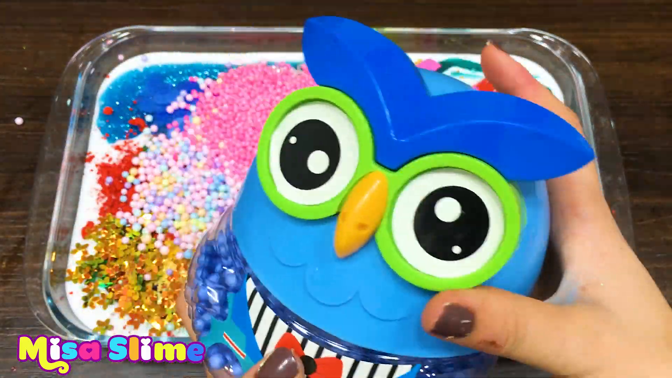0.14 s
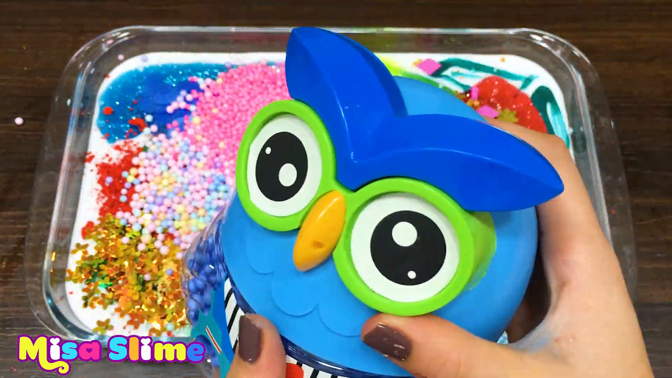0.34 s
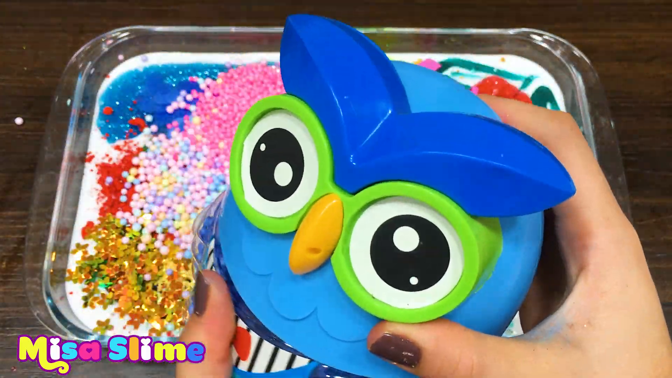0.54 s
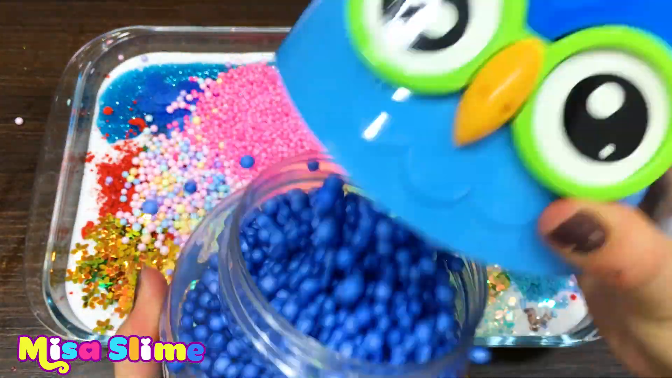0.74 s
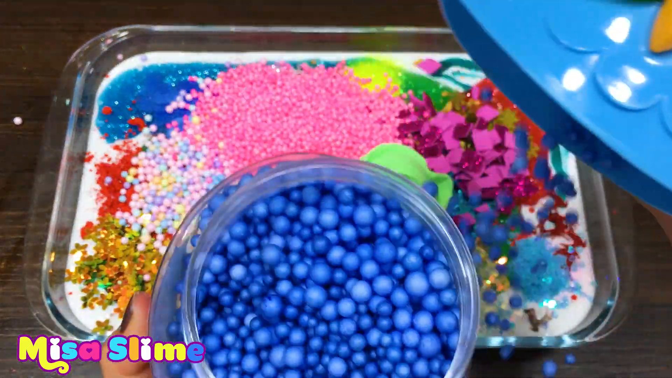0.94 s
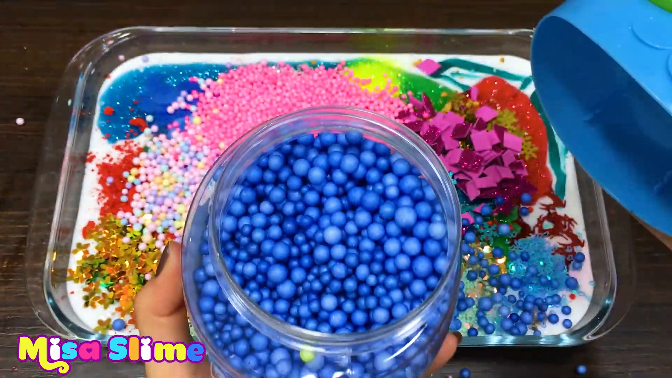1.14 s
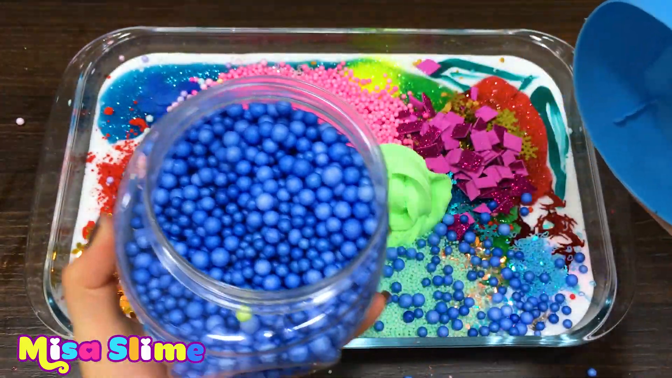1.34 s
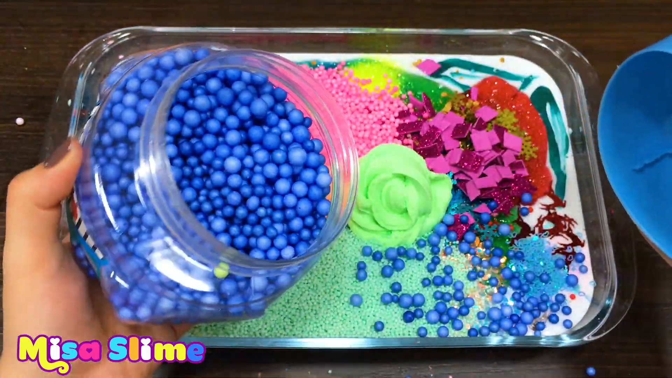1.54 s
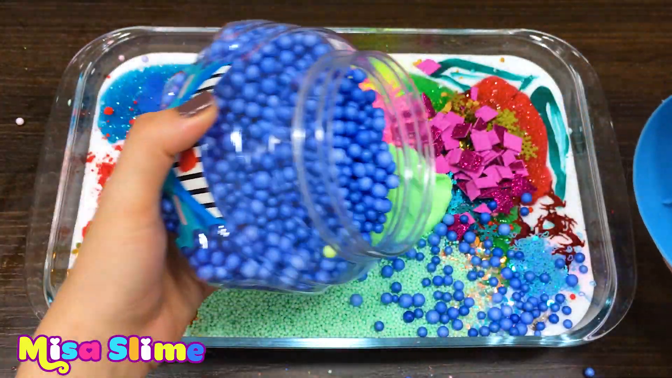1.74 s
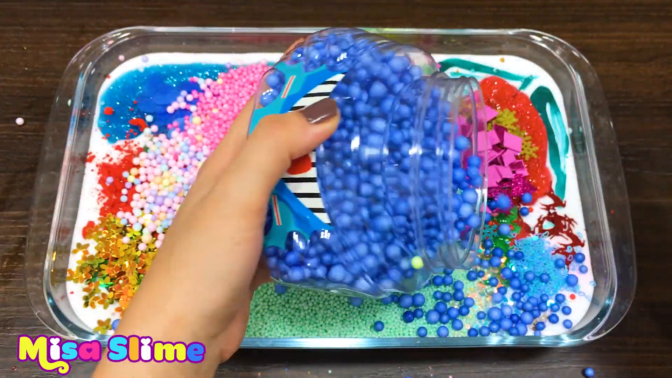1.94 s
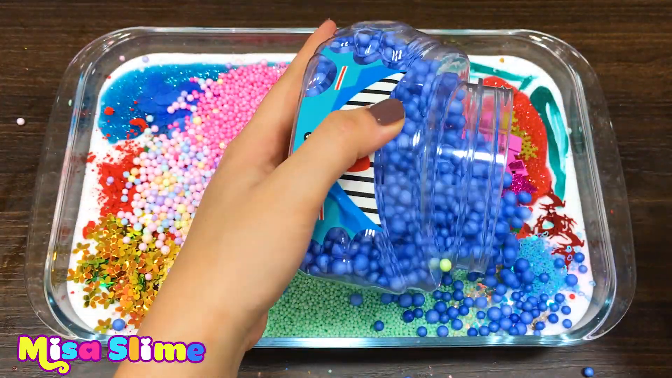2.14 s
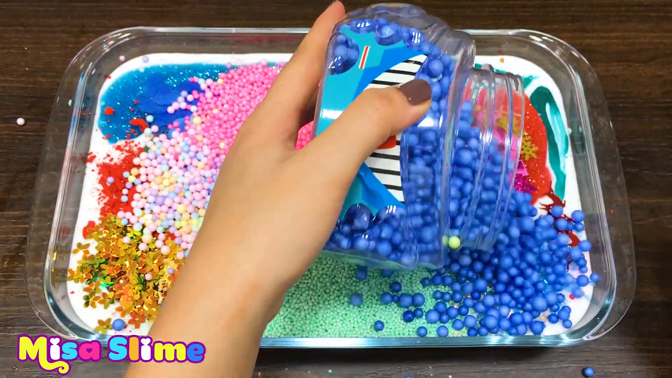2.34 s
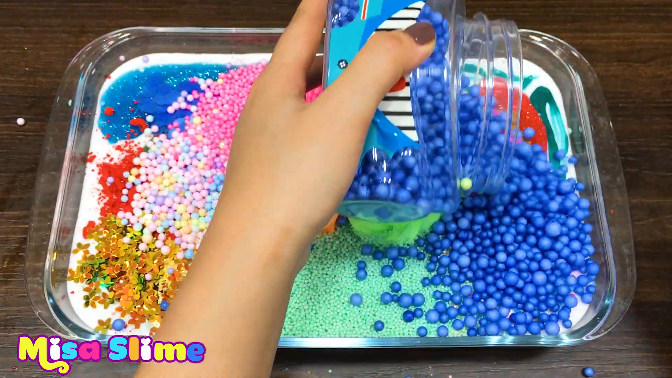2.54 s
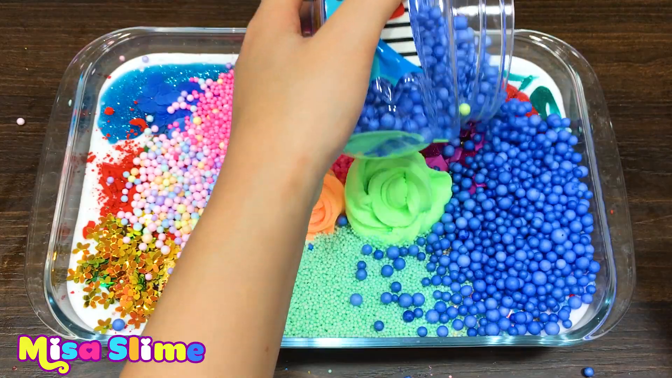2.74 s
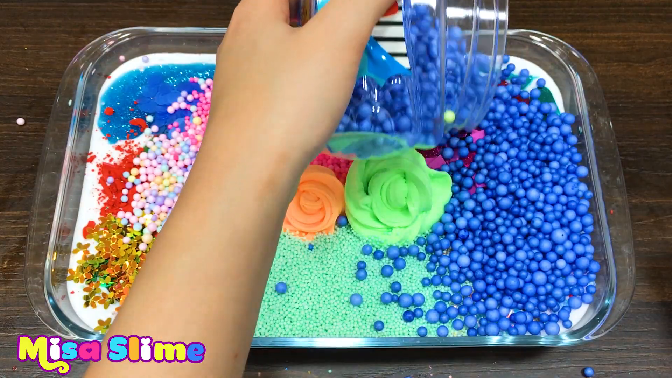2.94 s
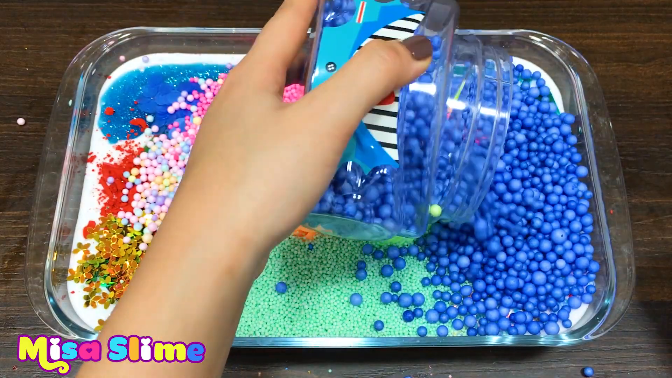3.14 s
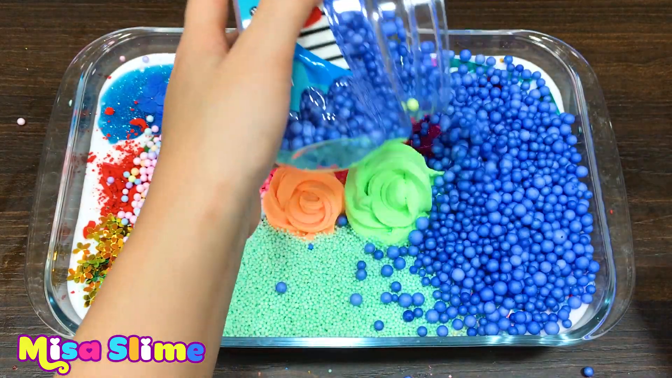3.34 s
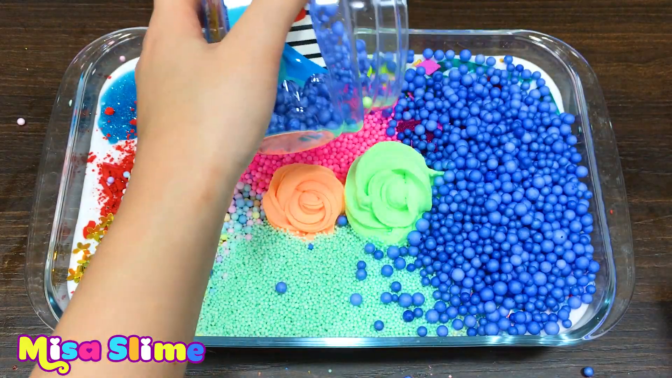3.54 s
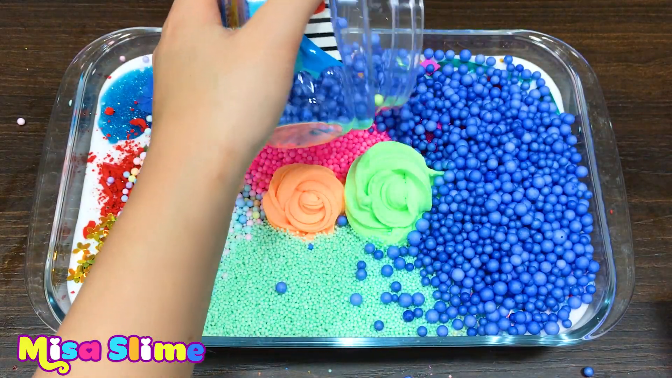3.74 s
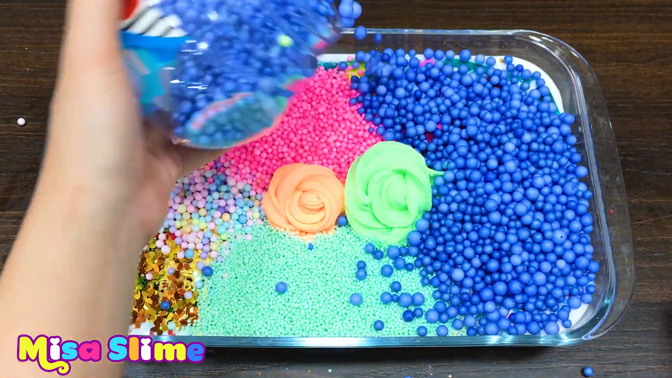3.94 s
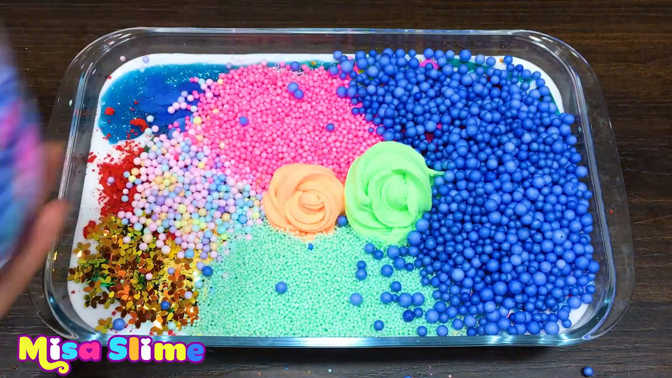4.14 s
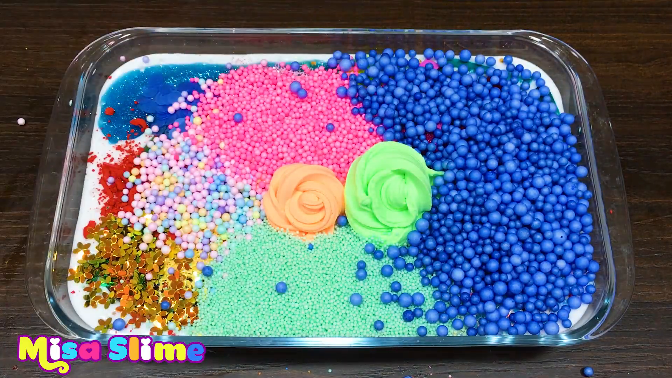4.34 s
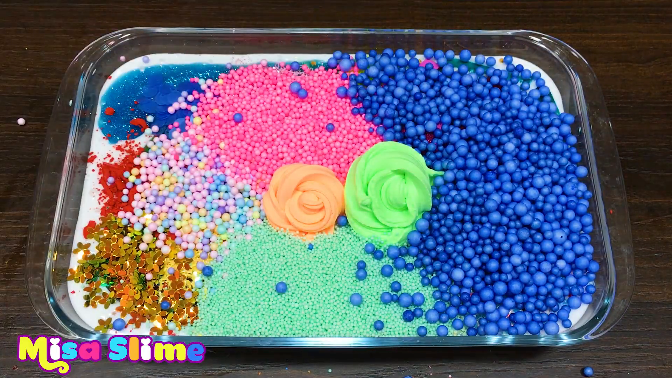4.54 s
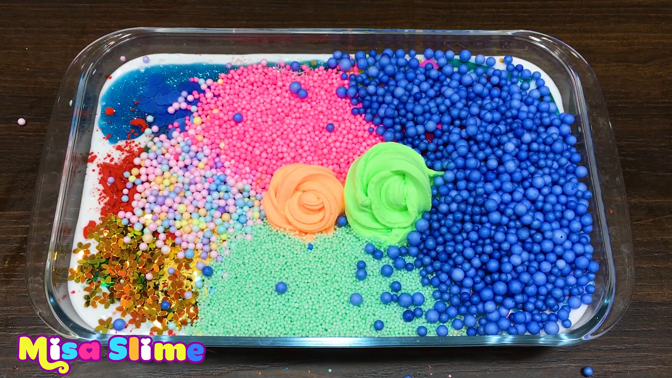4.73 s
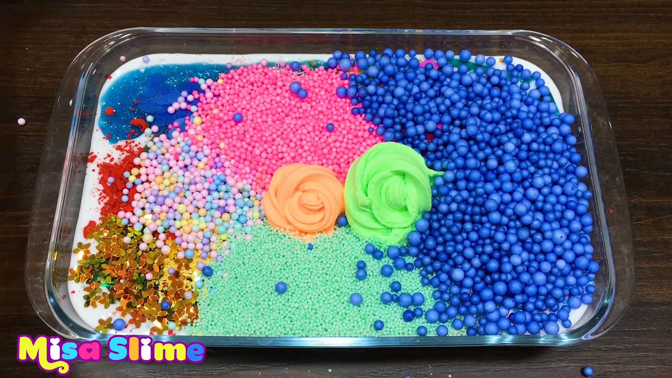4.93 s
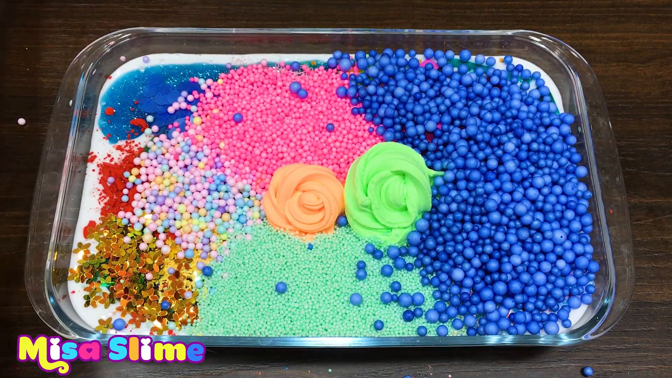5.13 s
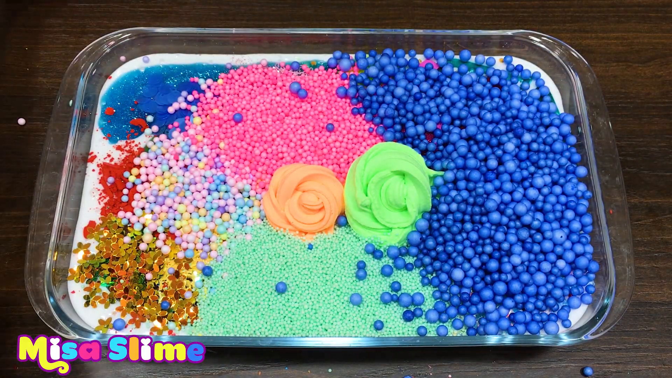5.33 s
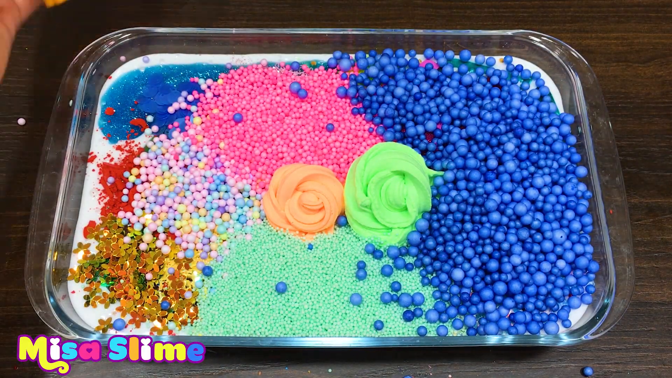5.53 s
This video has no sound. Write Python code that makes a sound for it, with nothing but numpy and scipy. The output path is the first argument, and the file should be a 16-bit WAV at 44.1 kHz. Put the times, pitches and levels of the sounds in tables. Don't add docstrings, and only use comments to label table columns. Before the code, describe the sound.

Close, dry handling sounds in a bare room with a short reverberant tail, over soft hiss and uneven low rumble from moving hands. From 0.15 to 0.6 s a hollow plastic lid is twisted, with small knocks, thread scrapes and faint bead rustle. At 0.61 s it snaps free with a very loud, sharp crack that overloads; at about 0.84 s it knocks the rim in a quick, hard clatter. Beads spill with a light patter until 1.3 s, single ones skipping away, then near quiet. From 2 s the tipped jar releases a growing stream of tiny crisp clicks with a thin plastic ring, fullest around 2.5 to 3.5 s. Sparse trickling follows until 4.15 s. At 4.2 to 4.7 s the remaining beads rattle back, more resonant, with sharp ticks. The jar is set down softly at 4.7 s; after a lull, a jerky plastic scrape at 5.3 to 5.5 s fades out.

```python
import sys
import numpy as np
from scipy import signal
from scipy.fft import irfft
from scipy.io import wavfile
from scipy.ndimage import uniform_filter1d

SR = 44100
rng = np.random.default_rng(int(sys.argv[2]) if len(sys.argv) > 2 else 0)


def digitize_waveform(pressure):
    field = np.atleast_2d(pressure).T
    bounded = np.clip(field, -1, 1)
    quanta = np.round(bounded * 32767).astype(np.int16)
    wavfile.write(sys.argv[1], SR, quanta)


def voltage_ratio(level):
    return 10 ** (np.asarray(level, float) / 20)


N = 250488
TIME = np.arange(N) / SR

# (time [s], peak [dB], cavity boom [dB], crack [dB], contact [ms])
LID_TWISTS = [(.149, -49, -5.5, -10, 2), (.1572, -36.5, -3.5, -2, 3.3), (.2665, -41.5, -4.5, -12, 2),
              (.277, -45.5, -8, -4, 2), (.2822, -39.5, -9.5, -5, 2.8), (.3731, -40.5, -11.5, -6.5, 2.5),
              (.4155, -51, -2.5, -1, 4.2), (.433, -49, 0.5, -6, 5.1), (.392, -50.5, 8.5, -11, 2.8),
              (.4565, -33.5, 1, -4.5, 2.7), (.5034, -36, -8.5, 12, 1.2), (.5332, -36, -10.5, 10.5, 1.4),
              (.5532, -40.5, -6.5, 8.5, 1.73), (.5885, -41, -18, 3.5, 2), (.595, -41, -16, 5.5, 2.7)]
LID_SNAPS = [
    (0.6074, -11, -14.5, -5.5, 2),
    (0.6131, 5.5, -12.5, -3.5, 4.6),
]
LID_NUDGES = [
    (0.7714, -21.5, -15.5, -15.5, 2.3),
    (0.7763, -27.5, 13, -17.5, 3.6),
    (0.7835, -25, 8, -3, 4),
    (0.8164, -20, 0.5, -6, 4.4),
    (.819, -20, 7, -6, 5),
]
LID_BUMPS = [
    (.8399, -4.5, -13, 3.5, 3.4),
    (.8425, -5.5, -3.5, -7, 3.7),
    (.8465, -9.5, -2.5, -8.5, 4.2),
    (.853, -23.5, 11.5, -8.5, 2.6),
    (1.059, -34.5, 0, -14, 3.1),
]
# (pitch [Hz], level [dB], 60 dB decay [s])
TIGHT_MODES = [(317, -4, .025), (490, 0, 0.014), (860, -12, 0.016), (1320, 0, 0.045), (1520, 0, 0.018),
               (1820, -5, .015), (2420, -4.5, 0.032), (2950, -5.5, 0.018), (3820, -9.5, 0.013)]
SNAP_MODES = [(354, 3, 0.02), (518, -11.5, 0.018), (778, -14, 0.021), (1163, 2.5, .024), (1340, -4, 0.015),
              (1620, -4, 0.013), (1805, -1, 0.025), (2010, -10, 0.0062), (2340, -6.5, 0.025),
              (2534, -7.5, .018), (2985, -9, 0.019), (3240, -10, 0.024), (3800, -6.5, 0.0049),
              (4000, -12, 0.01)]
LOOSE_MODES = [(351.8, 0, 0.016), (430.8, -5, .014), (630, -13.5, .012), (1210, 3.5, 0.018),
               (1780, -10, 0.023), (2800, -13, 0.016)]
LIFTED_MODES = [(418, -0.5, 0.012), (484, -8, 0.02), (666, -2, 0.03), (972, -5, 0.015), (1080, 1.5, 0.017),
                (1310, 4, 0.034), (1540, -4, 0.013), (1701, -0.5, 0.061), (2235, -2.5, 0.03),
                (2786, -1, 0.023), (3100, -10.5, 0.024), (3658, -20, 0.0062), (4270, -9, 0.011)]
# (frequency [Hz], level [dB per Hz])
CRACK_COLOUR = [(300, -24.5), (1000, -2), (3000, -5), (3800, -8), (5000, -4), (6100, -9.5), (7150, -5),
                (8000, -10), (9300, -12), (10700, -9.5), (12200, -15.5), (13800, -21.5), (15200, -19.5),
                (17000, -28.5)]
# (frequency [Hz], level [dB])
LID_ECHO = [(200, 1.5), (400, 0.5), (800, -3.5), (1200, -2), (1800, -1.5), (2800, 1), (3800, -1), (5500, 0),
            (8500, -2.5), (14000, -2.5)]

# (time [s], level [dB])
RUSTLE = [(0, -73.5), (.26, -76), (.324, -67.5), (.46, -70), (.586, -68), (.6, -56.5)]
SPILL = [(.62, -50), (.92, -45), (1.15, -51.5), (1.25, -54.5), (1.33, -63.5), (1.55, -83)]
POUR = [(1.8, -79), (1.99, -66), (2.25, -59.5), (2.36, -53.5), (2.501, -50), (2.751, -51), (3.0, -53.5),
        (3.37, -52), (3.65, -57.5), ]
TRICKLE = [(3.64, -54.5), (3.75, -68.5), (3.87, -58.5), (4.03, -58.5), (4.13, -65), (4.179, -78)]
SLIDE_BACK = [(4.17, -68.5), (4.3, -56), (4.33, -55), (4.4, -53.5), (4.574, -57), (4.69, -67.5),
              (4.72, -68.5)]
# (wall ring at first [dB], at last [dB], neck ring [dB], bead rate [log10 of beads per s])
FLOW_SETTINGS = [
    (2.5, 2.5, -12.5, 3.4),
    (-14, -15, -21, 3.5),
    (-4.5, -14.5, -19, 3.72),
    (-18.5, -6.5, -13, 4.1),
    (-9, -0.5, -14, 3.6),
]
# (frequency [Hz], level [dB per Hz])
BEAD_COLOUR = [(710, -35.5), (1200, -6), (1680, -10), (2070, -5.5), (2810, -3.5), (3810, -8.5), (4110, -3),
               (5830, -5), (6370, -7.5), (7100, -3), (9630, -6), (12000, -1.5), (13700, -3.5), (15100, -2),
               (16300, -6.5)]
# (pitch [Hz], width [Hz], level [dB])
CLOSED_WALL = [(340, 150, -3), (510, 130, 1.5), (1230, 200, 0), (1600, 200, 0), (2600, 480, -4)]
POURING_WALL = [(890, 78, -1.5), (1000, 260, -4.5), (1330, 150, 2.5), (1480, 370, -1), (1840, 250, 0),
                (2350, 200, -2.5), (2800, 220, -4.5)]
DRAINED_WALL = [(840, 65, 0.5), (2022, 300, -10), (2950, 210, -3.5)]
RIGHTED_WALL = [(386, 260, -0.5), (853, 110, 1.5), (1270, 86, 8), (1770, 260, -3.5), (2375, 110, -1.5),
                (2690, 79, -1), (3095, 197, -5.5)]
# (pitch [Hz], width [Hz])
NECK_AIR = (4120, 220)
# (time [s], level [dB], dies in [s])
NECK_RUSHES = [
    (1.99, -75.5, .03),
    (2.11, -64.5, 0.079),
    (2.285, -56, 0.025),
    (2.445, -50, 0.093),
    (2.57, -60.5, 0.038),
    (4.32, -58, 0.044),
]
# (time [s], level [dB], dies in [s])
WALL_SQUEEZES = [
    (.154, -53, 0.011),
    (.27, -47, 0.012),
    (1.95, -66.5, 0.13),
    (2.12, -60.5, 0.091),
    (4.26, -64, 0.1),
    (4.31, -57.5, 0.19),
]
# (time [s], peak [dB])
BEAD_SKIPS = [(.9994, -38), (1.0154, -31), (1.044, -33.5), (1.089, -46), (1.1857, -33), (1.2107, -37),
              (1.2223, -37.5), (1.2396, -29.5), (1.265, -40), (1.2832, -37), (1.3094, -34.5), (1.3246, -40),
              (1.3645, -49.5), (1.3942, -42.5), (1.434, -49), (1.4694, -51.5)]
# (time [s], peak [dB], centre [Hz])
STRAY_BEADS = [(1.5557, -53.5, 14200), (1.7701, -46, 12100), (1.9321, -51, 4340), (1.9703, -49, 4520),
               (2.07, -47.5, 11270), (2.089, -48, 4440), (2.1791, -41.5, 4000), (2.2448, -50, 4750),
               (2.2648, -45, 4360), (2.2918, -38, 5740), (2.306, -38, 4160), (2.3309, -47, 4040),
               (2.3529, -45, 5120), (2.3803, -38, 7630), (2.4707, -34, 4080), (2.5814, -40.5, 4180),
               (2.7665, -35, 5900), (2.9017, -35, 7100), (3.1003, -41, 6900), (3.108, -38, 7490),
               (3.176, -38, 5710), (3.203, -39, 5770), (3.336, -36, 6210), (3.388, -36, 4810),
               (3.4978, -42, 4960), (3.5326, -34, 4000), (3.5522, -40.5, 4860), (3.5906, -37, 11620),
               (3.639, -40, 4470), (3.7837, -46.5, 4430), (3.7961, -45, 7070), (3.827, -52.5, 4250),
               (3.848, -49, 4970), (3.8645, -41, 8380), (3.9069, -44, 4590), (3.945, -41, 4440),
               (4.0094, -42, 6850), (4.0291, -44, 3980), (4.081, -48, 5090), (4.1106, -39.5, 12100),
               (4.1696, -45.5, 7440), (4.1967, -61, 9570), (4.1967, -36.5, 11200), (4.2465, -34, 10630),
               (4.312, -37, 7820), (4.3294, -42, 4000), (4.3721, -35, 11700)]
# (time [s], peak [dB], centre [Hz], width
SHAPED_CLICKS = [(.305, -52, 6500, .5), (.391, -45, 5600, .3), (4.1392, -45, 6850, 0.68),
                 (4.1864, -42, 7400, 0.88), (4.2578, -43, 4440, .3), (4.481, -35.5, 6000, 1),
                 (4.55, -41, 6500, 0.9), (1.416, -50.5, 1620, 0.0843), (3.534, -38, 2860, 1.1),
                 (4.4196, -29.5, 8020, 1.8), (4.432, -40, 5440, 0.28), (4.606, -36, 1116, 0.75),
                 (4.606, -44, 9500, 1), (4.7135, -49.5, 2000, 0.83), (4.986, -48.5, 1090, 0.487)]

# (time [s], level [dB], brightness [dB])
SET_DOWN = [(4.71, -52.5, -6), (4.718, -48, -28.5), (4.816, -57.5, -21), (4.91, -79, -1), (5.0, -82.5, -2)]
DRAG = [(5.29, -56, -7), (5.298, -55, 0.5), (5.318, -51, 0), (5.34, -47, -1.5), (5.378, -47, -8.5),
        (5.395, -49.5, 0.5), (5.45, -54.5, 3.5), (5.482, -52.5, -7), (5.68, -88, -1)]
SCRAPE = [(.262, -66.5, -3.5), (.285, -59.5, -3), (.31, -67.5, -3), (.37, -66, -1.5), (.412, -67, 0.5),
          (.418, -55.5, 2), (.45, -57, 2.5), (.462, -55, 2.5), (.472, -69, -3)]
# (frequency [Hz], level [dB per Hz])
SET_DOWN_COLOUR = [(120, -57), (400, -5.5), (752, -14), (1000, -5.5), (1190, 3), (1450, -5.5),
                   (1800, -10.5), (2150, -9), (2330, -3.5), (2550, -11), (3100, -8.5), (4000, -15.5),
                   (5290, -25), (15100, -26), (16300, -48.5)]
DRAG_COLOUR = [(120, -28), (200, -18), (502, -6), (582, -12.5), (752, -0.5), (1000, -13.5), (1380, -6.5),
               (1650, -6.5), (2050, -4.5), (2680, -13), (4100, -6), (5600, -15.5), (7510, -8.5),
               (9710, -20), (11900, -17.5), (16300, -32)]
THREAD_COLOUR = [(300, -30), (1500, -4.5), (3500, -8), (5000, -5.5), (6200, 2), (8500, -8.5), (11500, -3.5),
                 (14000, -12.5), (16300, -14)]
# (time [s], level [dB], dies in [s])
BASE_JERKS = [
    (4.712, -65, 0.0026),
    (5.295, -47.5, .006),
    (5.327, -48.5, .008),
    (5.392, -44.5, .008),
    (5.409, -46, 0.00658),
    (5.422, -47.5, 0.0045),
    (5.433, -45.5, 0.0049),
    (5.444, -47.5, 0.003),
    (5.466, -50, 0.00507),
]
# (time [s], peak [dB], pitch [Hz], 60 dB decay [s])
TABLE_THUDS = [
    (0.279, -40, 95.3, 0.28),
    (0.4571, -38, 89.2, 0.067),
    (.613, -44.5, 89.75, .06),
    (0.847, -43.5, 69.7, 0.1),
    (1.061, -44, 211, 0.066),
    (2.08, -37, 70, 0.21),
    (5.3, -49, 190.4, .1),
]
# (time [s], level [dB], dies in [s])
HAND_HEAVES = [(0, -55.5, 0.54), (.17, -59, 0.14), (.3, -52, 0.054), (.45, -35, 0.0096), (.61, -57, 0.042),
               (.84, -45, 0.069), (1.07, -59, .1), (1.58, -54, 0.074), (1.76, -56.5, 0.064),
               (2.0, -50.5, 0.046), (2.08, -51, 0.21), (2.9, -68, 0.14), (3.7, -69, 0.11),
               (4.65, -64.5, 0.19), (5.14, -62.5, .1), (5.36, -55, 0.12), (5.6, -61, 0.18)]
# (frequency [Hz], level [dB per Hz])
RUMBLE_COLOUR = [(12, -66), (20, -33), (41, -6.5), (70, 0.5), (137, -3.5), (215, -18.5), (267, -15.5),
                 (321, -25.5), (600, -28.5), (780, -59), (1320, -120)]
# (frequency [Hz], level [dB per Hz])
HISS_COLOUR = [(120, -26), (200, -2.5), (264, -5), (335, -5.5), (540, -11.5), (661, -11), (781, -8.5),
               (872, -8.5), (1260, -9.5), (1960, -13.5), (5390, -19), (6480, -21), (8230, -20),
               (15100, -24), (16300, -26.5)]
# (frequency [Hz], 60 dB decay [s])
ROOM_DECAY = [(200, 0.68), (350, 0.64), (600, 0.8), (1400, 0.84), (3500, 0.86), (8000, 0.68), (15000, 0.13)]
# (frequency [Hz], level [dB])
MIC_RESPONSE = [(20, -24.5), (45, -5.5), (70, -3), (5600, -0.5), (6500, -0.5), (7300, 0), (9000, 0),
                (9900, -1.5), (11500, 0.5), (12900, -1.5), (13700, -2.5), (14600, -0.5), (16200, 0.5),
                (16700, -14.5)]


def evened(x):
    return x / np.sqrt(np.mean(x ** 2) + 1e-20)


def read(points, hz):
    f, value = np.transpose(points)
    return np.interp(np.log(hz + 1), np.log(f + 1), value)


def colour(x, points):
    hz = np.abs(np.fft.fftfreq(16384, 1 / SR))
    log_gain = np.log(voltage_ratio(np.maximum(read(points, hz), -100)))
    response = np.exp(np.conj(signal.hilbert(log_gain)))
    impulse = np.fft.ifft(response).real[:8192]
    return signal.oaconvolve(x, impulse)[:len(x)]


def ring(x, hz, width):
    r = np.exp(-np.pi * width / SR)
    return signal.lfilter([1 - r, 0, r - 1], [1, -2 * r * np.cos(2 * np.pi * hz / SR), r * r], x)


def add(mix, s, sound):
    part = mix[round(s * SR):][:len(sound)]
    part += sound[:len(part)]


def columns(rows):
    s, *rest = np.transpose(rows)
    on = np.clip(np.minimum(TIME - s[0], s[-1] - TIME) / .003, 0, 1)
    return on, *(np.interp(TIME, s, column) for column in rest)


def swells(rows, rise_s):
    s, db, dies = np.transpose(rows)[:, :, None]
    coarse = np.arange(0, N / SR + .01, .001)
    t = np.maximum(coarse - s, 0)
    gain = voltage_ratio(db) * np.minimum(t / rise_s, 1) * np.exp(-np.maximum(t - rise_s, 0) / dies)
    return np.interp(TIME, coarse, gain.sum(0))


def knock(modes, db, boom_db, crack_db, contact_ms):
    t, hz = np.arange(4096) / SR, np.fft.rfftfreq(4096, 1 / SR)
    contact_s = max(contact_ms, .2) / 1000
    grit_level = voltage_ratio(-11.0) * np.exp(-2 * t / contact_s) + voltage_ratio(-24) * np.exp(-t / contact_s / 7.9)
    grit = rng.standard_normal(len(t)) * grit_level
    late = 2 * np.sqrt(1000 * hz) - hz * np.sqrt(1000 / 17000)
    wave = irfft(np.exp(-2j * np.pi * contact_s * late)) * (t < .04)

    boom_and_shell = np.zeros((2, len(t)))
    for k, (mode_hz, mode_db, t60) in enumerate(modes):
        mode_hz *= rng.uniform(0.99, 1.01)
        swell = (-1) ** k * (1 - np.exp(-t * mode_hz / 1.9))
        tone = voltage_ratio(mode_db - 60 * t / t60) * np.sin(2 * np.pi * mode_hz * t)
        boom_and_shell[int(mode_hz > 950)] += swell * tone
    push = 0.5 * grit + 3 * (t == 0)
    shaken = signal.fftconvolve(boom_and_shell, push[None], axes=1)[:, :len(t)]

    bend_hz, bend_width_hz, bend_db = 1650, 1000, -5.5
    bend = ring(ring(wave, bend_hz, bend_width_hz), bend_hz, bend_width_hz)
    shaken[1] = shaken[1] / abs(shaken[1]).max() + voltage_ratio(bend_db) * bend / abs(bend).max()
    parts = np.vstack([shaken, colour(4.1 * wave + grit, CRACK_COLOUR)])
    parts /= abs(parts).max(1, keepdims=True)
    return voltage_ratio(db) * (voltage_ratio([boom_db, 0, crack_db]) @ parts)


def lid():
    out = np.zeros(N)
    blow_kinds = [(LID_SNAPS, SNAP_MODES), (LID_BUMPS, LIFTED_MODES),
                  (LID_NUDGES, LOOSE_MODES), (LID_TWISTS, TIGHT_MODES)]
    for blows, modes in blow_kinds:
        for s, *blow in blows:
            add(out, s, knock(modes, *blow))
    return out


def beads(rows, walls, wall_first_db, wall_last_db, neck_db, log_rate):
    on, db = columns(rows)
    wall_db = np.interp(TIME, [rows[0][0], rows[-1][0]], [wall_first_db, wall_last_db])
    clumps = evened(uniform_filter1d(rng.standard_normal(N), 500))
    chance, size, kind = rng.random(N), rng.exponential(1, N), rng.integers(0, 12, N)
    hits = chance < 10 ** log_rate / SR
    size_db = 2.5 * np.minimum(size, 5) + 1.1 * clumps
    clicks = hits * voltage_ratio(size_db) * rng.choice([-1, 1], N)

    ticks = np.zeros(N)
    for k, hz in enumerate(np.geomspace(1500, 15000, 12)):
        ticks += ring(clicks * (kind == k), hz, 0.82 * hz) / np.sqrt(hz)
    wall = sum(voltage_ratio(wall_mode_db) * evened(ring(clicks, hz, width)) for hz, width, wall_mode_db in walls)
    neck = ring(clicks * voltage_ratio(2.4 * clumps), *NECK_AIR)

    wall_gain = voltage_ratio(db + wall_db) + swells(WALL_SQUEEZES, rise_s=0.018)
    neck_gain = voltage_ratio(-4.5) * (voltage_ratio(db + neck_db) + swells(NECK_RUSHES, rise_s=0.031))
    foam = voltage_ratio(db) * evened(colour(ticks, BEAD_COLOUR))
    return on * (foam + wall_gain * evened(wall) + neck_gain * evened(neck))


def bead_flows():
    flows = [RUSTLE, SPILL, POUR, TRICKLE, SLIDE_BACK]
    walls = [CLOSED_WALL, POURING_WALL, POURING_WALL, DRAINED_WALL, RIGHTED_WALL]
    return sum(beads(rows, wall, *settings) for rows, wall, settings in zip(flows, walls, FLOW_SETTINGS))


def lone_clicks():
    out, t = np.zeros(N), np.arange(400) / SR
    skip_hz, scatter, bead_width = 6790, 0.14, 0.9
    skips = [(s, db, skip_hz * np.exp(scatter * rng.standard_normal()), bead_width) for s, db in BEAD_SKIPS]
    strays = [(*row, bead_width) for row in STRAY_BEADS]
    for s, db, hz, share in skips + strays + SHAPED_CLICKS:
        noise = rng.standard_normal(len(t)) * np.minimum(t / .0004, 1) * np.exp(-t / 0.00066)
        burst = ring(noise + (t == t[16]), hz, share * hz)
        burst = ring(burst, hz, 1.4 * share * hz)
        add(out, s, voltage_ratio(db) * burst / abs(burst).max())
    return out


def rub(rows, body):
    on, db, bright_db = columns(rows)
    unevenness = evened(uniform_filter1d(rng.standard_normal(N), 80))
    slips = rng.standard_normal(N) * voltage_ratio(1.5 * unevenness)
    _, _, z = signal.stft(colour(slips, body), SR, nperseg=256)
    judder = uniform_filter1d(rng.standard_normal(z.shape), 5, 0)
    judder = evened(uniform_filter1d(judder, 4, 1))
    x = signal.istft(z * voltage_ratio(1.5 * judder), SR, nperseg=256)[1][:N]
    low = signal.sosfilt(signal.butter(2, 4500, fs=SR, output="sos"), x)
    gain = voltage_ratio(db) + swells(BASE_JERKS, rise_s=0.0033)
    return on * gain * (evened(low) + voltage_ratio(bright_db) * evened(x - low))


def thuds():
    out, t = np.zeros(N), np.arange(SR // 3) / SR
    for s, db, hz, t60 in TABLE_THUDS:
        add(out, s, voltage_ratio(db - 60 * t / t60) * (1 - np.exp(-t / 0.0044)) * np.sin(2 * np.pi * hz * t))
    return out


def room(x):
    taps = np.zeros(SR)
    at = np.arange(100, SR - 20, 20)
    build_up = np.clip(at / SR / 0.019, .25, 1)
    taps[at + rng.integers(0, 20, len(at))] = rng.choice([-1., 1.], len(at)) * build_up
    hz, t, z = signal.stft(taps, SR, nperseg=256)
    decay = voltage_ratio(-60 * t / read(ROOM_DECAY, hz)[:, None])
    tail = signal.istft(z * decay, SR, nperseg=256)[1]
    return signal.fftconvolve(x, tail / np.linalg.norm(tail))[:N]


def background():
    lumps = voltage_ratio(0.51 * evened(uniform_filter1d(rng.standard_normal(N), 2500)))
    rumble = evened(lumps * colour(rng.standard_normal(N), RUMBLE_COLOUR))
    rumble_gain = voltage_ratio(-64.5) + swells(HAND_HEAVES, rise_s=0.031)
    hush_db, hush_s, hush_span_s = -4.5, 1.55, 0.35
    hiss_db = -63.5 + hush_db * np.exp(-((TIME - hush_s) / hush_span_s) ** 2)
    hiss = evened(colour(rng.standard_normal(N), HISS_COLOUR))
    return rumble_gain * rumble + voltage_ratio(hiss_db) * hiss


def scene():
    shell = lid()
    foam = bead_flows() + lone_clicks()
    rubs = rub(SET_DOWN, SET_DOWN_COLOUR) + rub(DRAG, DRAG_COLOUR) + rub(SCRAPE, THREAD_COLOUR)
    to_room = voltage_ratio(-12.0) * colour(shell, LID_ECHO) + voltage_ratio(-14) * foam + voltage_ratio(-9.5) * rubs
    return (shell + foam + rubs + room(to_room) + thuds() + background())[None]


def roll_off(x):
    return signal.sosfilt(signal.butter(12, 16410, fs=SR, output="sos"), x)


def record(dry):
    clipped = np.clip(colour(dry[0], MIC_RESPONSE), -1, 1)
    band_limit = signal.firwin(511, 16550, window=("kaiser", 9), fs=SR)
    limited = signal.oaconvolve(clipped, band_limit, "same")
    return roll_off(limited[None])


dry = scene()
out = record(dry)
digitize_waveform(out)
```